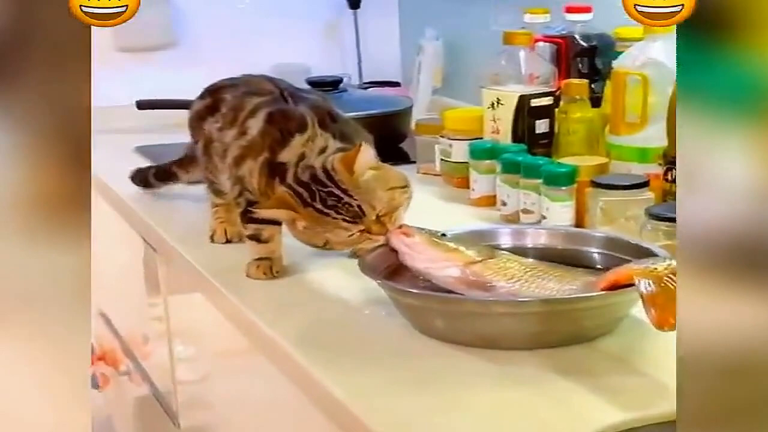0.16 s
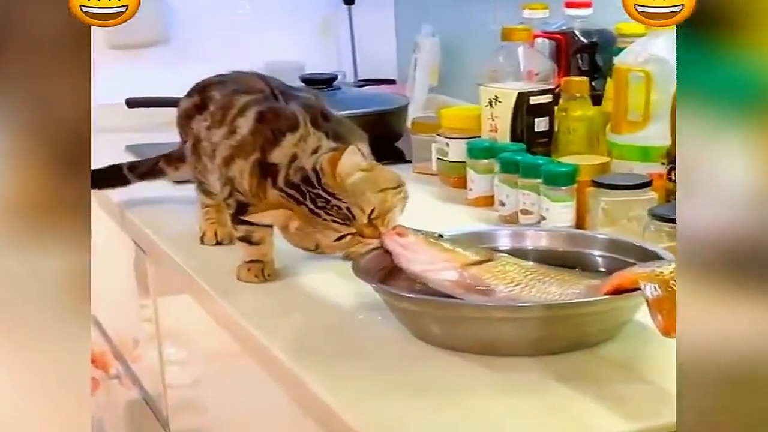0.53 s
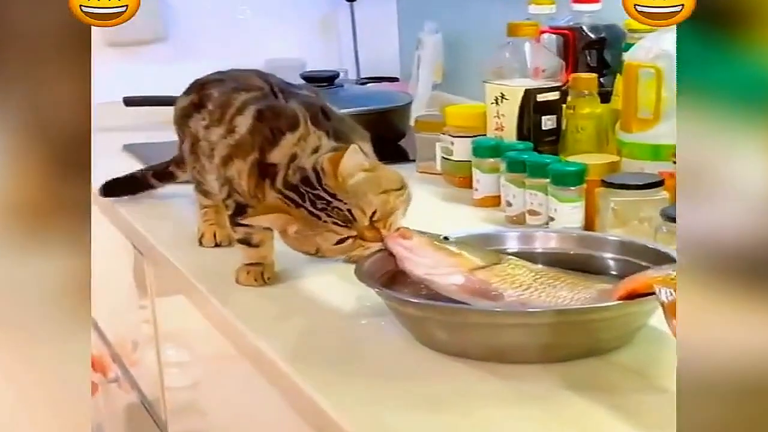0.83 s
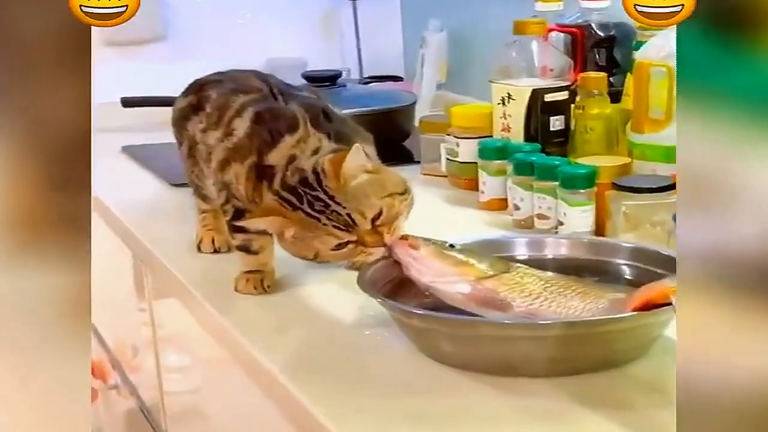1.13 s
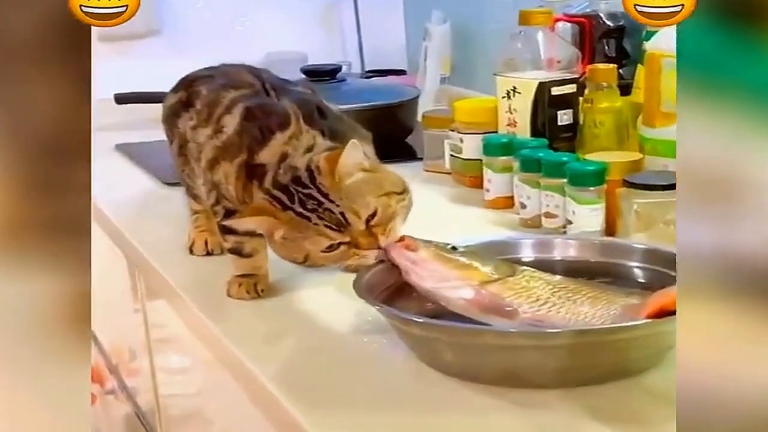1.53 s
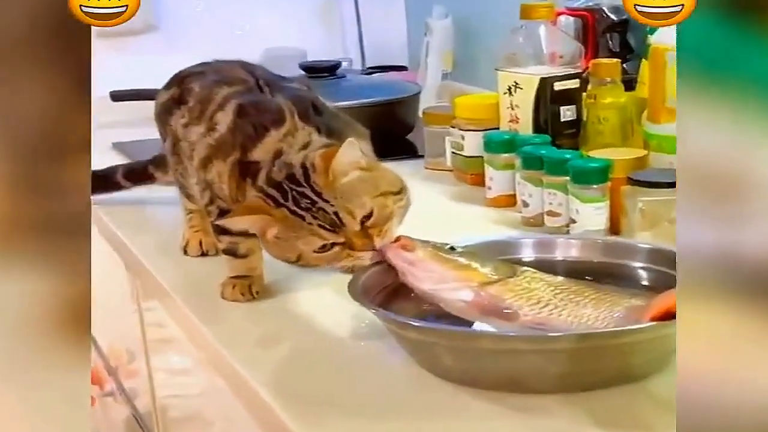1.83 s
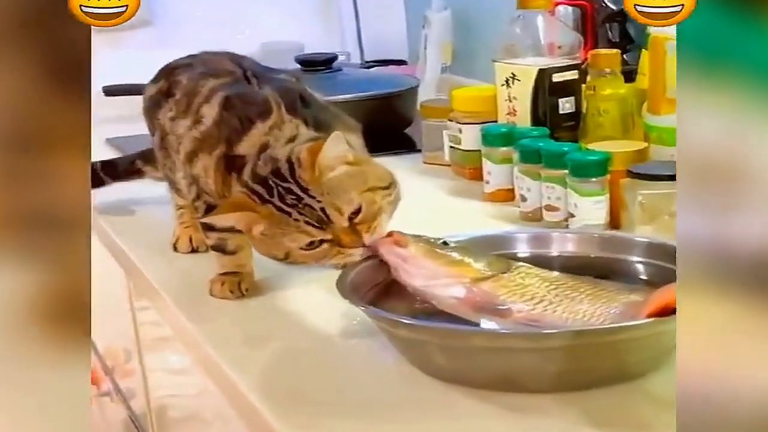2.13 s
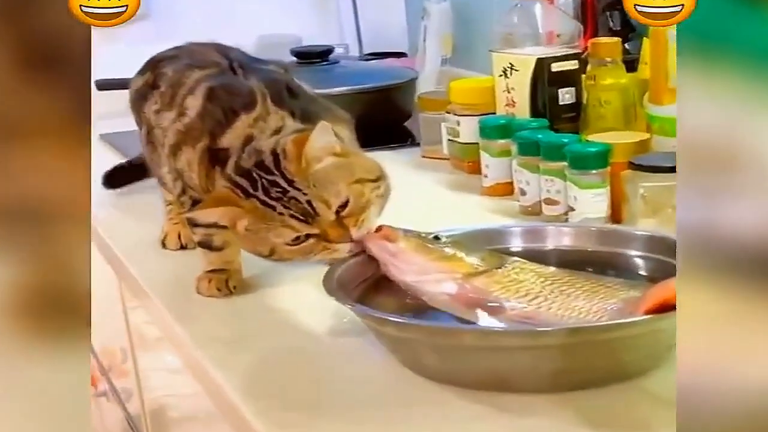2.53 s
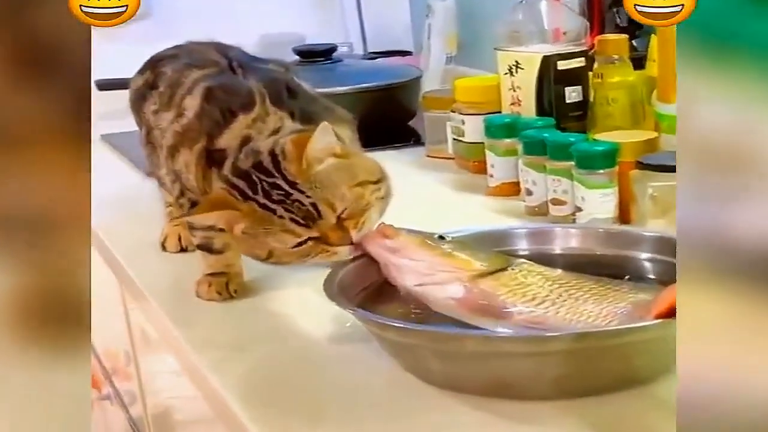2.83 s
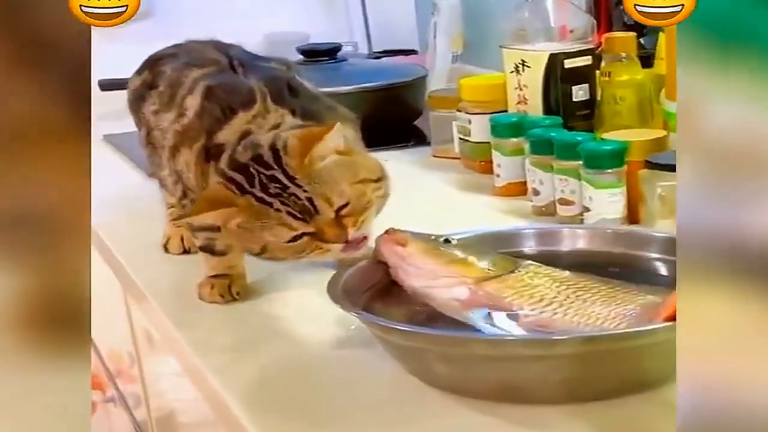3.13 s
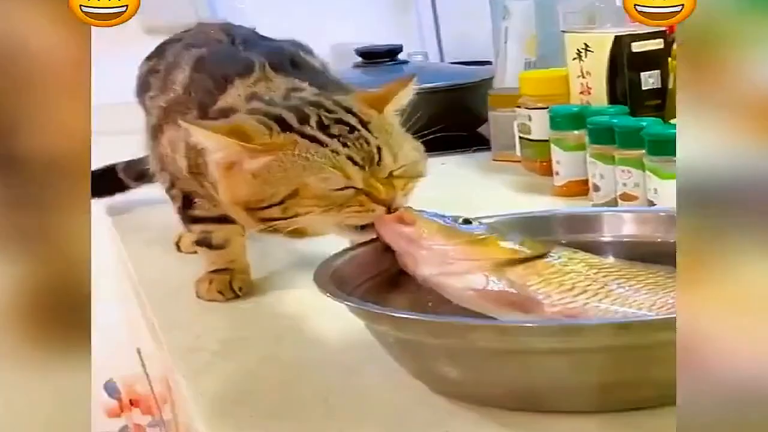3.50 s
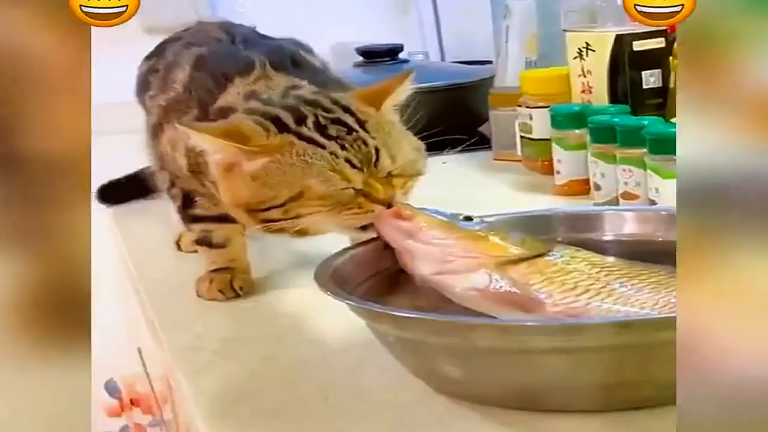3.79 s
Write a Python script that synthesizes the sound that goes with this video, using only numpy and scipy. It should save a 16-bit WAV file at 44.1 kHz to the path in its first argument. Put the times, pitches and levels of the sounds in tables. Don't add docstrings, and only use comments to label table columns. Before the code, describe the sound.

Muffled fluttering cat growl with wet chewing smacks, then a sudden higher yowl, close in a kitchen

```python
import sys
import numpy as np
from scipy import signal
from scipy.fft import rfft, irfft, next_fast_len
from scipy.io import wavfile

SR = 44100
rng = np.random.default_rng(int(sys.argv[2]) if len(sys.argv) > 2 else 0)


def decibels_to_gain(level_db):
    exponent = np.asarray(level_db, float) / 20
    return 10 ** exponent


def persist_wave(psi):
    counts = np.round(np.clip(psi, -1, 1) * 32767).astype(np.int16)
    wavfile.write(sys.argv[1], SR, np.atleast_2d(counts).T)


N = 174195

# time in seconds, hum pitch in Hz, hum level in
# dB, throat pulse level in dB.
GROWL_CONTOUR = [
    (0, 211.2, -21, -26.5),
    (.11, 188.1, -19, -30),
    (.26, 205, -19, -28.5),
    (.4, 180.3, -18.5, -30),
    (.52, 190, -15.5, -30.5),
    (.6, 180.5, -15.5, -31),
    (.76, 173.8, -15, -33),
    (.87, 190.7, -14, -28),
    (1.07, 181, -23.5, -33),
                 (1.239, 175.9, -27, -49.5),
    (1.351, 166.9, -21, -44),
    (1.421, 152.2, -17.5, -38.5),
    (1.489, 186.7, -21.5, -36),
    (1.611, 187.3, -20.5, -38.5),
    (1.68, 183.2, -15, -34),
    (1.791, 164.7, -19, -34.5),
    (1.87, 162.7, -17, -36),
    (1.95, 202.7, -15, -26.5),
                 (2.0, 207, -20, -25.5),
    (2.06, 187.5, -15.5, -29),
    (2.118, 166.7, -16.5, -37.5),
    (2.193, 184.9, -15, -28.5),
    (2.257, 169.1, -16, -33.5),
    (2.328, 200.4, -17.5, -25),
    (2.421, 171.3, -16, -29),
    (2.498, 160.3, -17, -27.5),
    (2.599, 159.2, -16, -26.5),
                 (2.672, 179.1, -17.5, -25),
    (2.733, 158.4, -16.5, -28),
    (2.881, 156, -17, -25.5),
    (2.96, 200.1, -18, -28),
    (3.032, 197.6, -17, -23.5),
    (3.118, 187.2, -14, -27.5),
    (3.167, 181.8, -16.5, -33.5),
                 (3.35, 191.6, -20.5, -26.5),
    (3.42, 173.9, -16.5, -27.5),
    (3.501, 184.2, -16.5, -25),
    (3.572, 201.8, -17, -23.5),
    (3.64, 200.2, -18, -23.5),
    (3.687, 203, -46, -22),
]
# start in seconds, end in seconds.
BREATHS = [
    (-.1, 1.085),
    (1.24, 3.17),
    (3.345, 3.69),
]
# time in seconds, pulse rate in Hz, first partial in dB, second partial in dB.
YOWL = [
    (3.63, 300, -56.5, -63),
    (3.69, 367.7, -22, -29.5),
    (3.745, 426.6, -52, -21),
    (3.8, 424.2, -32, -27.5),
    (3.86, 401.7, -27.5, -27),
    (3.905, 406, -24, -21.5),
    (3.96, 355, -18, -29.5),
]
# widest moment in seconds, opening in seconds, closing in seconds, level in dB,
# upper resonances in dB.
CHEWS = [(0.059, 0.068, 0.07, -36, -16), (0.139, 0.077, 0.085, -33.5, -5.5),
         (0.342, 0.057, 0.047, -36, -24), (.42, 0.14, 0.15, -36.5, -4), (0.636, 0.034, 0.054, -33.5, -16),
         (0.728, 0.082, 0.086, -35.5, 2.5), (0.951, 0.055, 0.057, -29.5, -16.5),
         (1.021, 0.075, 0.084, -36.5, -2), (1.389, 0.051, 0.086, -40, -0.5),
         (1.49, 0.061, 0.08, -40.5, 7.5), (1.662, 0.037, 0.042, -32.5, -1), (1.771, 0.1, 0.074, -30.5, 0.5),
         (2.001, 0.11, 0.17, -28.5, -2.5), (2.402, 0.11, 0.093, -23.5, -3), (2.733, 0.094, 0.062, -32, -3),
         (2.98, 0.082, 0.078, -28, -10.5), (3.109, 0.091, 0.055, -23, -7),
         (3.38, 0.086, 0.062, -32.5, -7.5), (3.479, 0.081, 0.07, -17, -2.5), (3.822, 0.15, 0.077, -20, -1)]
# frequency in Hz, width in Hz, level in dB.
THROAT = [(341, 37.4, 4), (438.3, 37, 0.5), (527.7, 53.4, 3), (697, 64, -6), (793.5, 153, -14),
          (1115, 395, -20), (2380, 120, -27)]
MOUTH_SIDES = [(850.6, 45, 5.5), (1159, 89, 4), (1194, 405, -10)]
MOUTH_MIDDLE = [(933, 35.3, 0), (1050, 58, 0)]
MOUTH_UPPER = [(1430, 39.7, 0.5), (1677, 62, 0), (1879, 124, -3.5), (2108, 424, -10.5)]
PHARYNX = [(552, 79, 0), (700, 50, 0), (800, 50, -1)]
# time in seconds, side resonances in dB, middle resonances in dB.
TONGUE = [
    (0, -1, -4),
    (1.1, -2, -1.5),
    (1.4, -6.5, -3),
    (2.0, -2.5, -0.5),
    (2.35, -3, 2.5),
    (3.1, -4, -2),
    (3.45, -3.5, -6),
    (3.95, 5, 8.5),
]
# centre in seconds, half width in seconds, depth in dB.
FLIPS = [
    (0.073, 0.043, 10.5),
    (0.343, 0.025, 12.5),
    (.65, 0.02, 11),
    (0.971, 0.026, 13),
    (1.369, 0.058, 7.5),
    (1.999, 0.044, 5),
    (2.57, 0.068, 7.5),
    (2.8, 0.057, 7),
]
# centre in seconds, half width in seconds, gain in dB.
SAGS = [
    (1.53, 0.075, 11),
    (2.8, .08, 2),
]
# centre in seconds, half width in seconds, level in dB.
GULPS = [
    (2.98, 0.082, -37),
    (3.6, 0.049, -29.5),
    (3.68, 0.017, -44),
]
MOUTH_PATTERN_DB = [0, -1, -7, -10]
THROAT_PATTERN_DB = [0, -1, -8]
# time in seconds, peak level in dB, pitch in Hz.
SMACKS = [(0.0782, -21, 6340), (0.091, -23, 5900), (0.244, -28.5, 5530), (0.2857, -32.5, 6470),
          (0.3566, -30, 5020), (0.399, -22, 5660), (.413, -29.5, 4840), (.5536, -33, 5370),
          (0.6456, -28, 5900), (.6774, -30, 4770), (0.6986, -27.5, 5570), (0.8305, -33, 5000),
          (1.0056, -32.5, 5500), (1.064, -41, 1730), (1.363, -26, 2483), (1.43, -25.5, 6000),
          (1.5368, -22.5, 5493), (1.578, -22, 2430), (1.6444, -25, 3107), (1.6881, -24, 5750),
          (1.7416, -24, 4648), (1.8333, -12, 5000), (1.841, -31.5, 5000), (2.038, -27.5, 5868),
          (2.2901, -25.5, 7267), (2.703, -27.5, 6484), (2.9881, -25.5, 7247), (3.1077, -30, 6708),
          (3.2674, -41, 2987), (3.352, -24, 3009), (3.4535, -21.5, 4518), (3.471, -33, 5500),
          (3.487, -37.5, 5072), (3.747, -28.5, 7210), (3.7641, -53, 3070)]
# start in seconds, length in seconds, level in dB, centre in Hz, width in Hz.
GASPS = [(.612, .025, -44, 2900, 600), (.858, .035, -46, 3050, 500), (1.24, .03, -43, 1800, 500),
         (1.262, .025, -45, 3150, 400), (1.266, 0.02, -35, 2080, 400), (1.366, 0.065, -39, 3200, 1000),
         (1.38, .06, -39.5, 2200, 500), (1.683, 0.025, -39, 3250, 600), (1.96, .09, -43, 3150, 500),
         (3.264, 0.055, -51.5, 6500, 1500), (3.265, 0.089, -40, 1500, 900), (3.27, 0.076, -38, 2800, 1800),
         (3.564, .07, -54.5, 7000, 899)]
# start in seconds, level in dB, pitch in Hz, 60 dB decay in seconds.
THUDS = [
    (0.931, -15.5, 80, 0.36),
    (2.242, -16.5, 76.65, 0.21),
]
# frequency in Hz, level in dB per Hz.
ROOM = [(20, 4), (45, -1.5), (94, -5.5), (400, -19), (1200, -37), (2600, -37.5), (6000, -44.5),
        (8500, -51.5)]
# time in seconds, peak level in dB.
TICKS = [
    (0.0024, -84),
    (1.063, -56),
    (1.363, -57),
    (1.8327, -58.5),
    (1.8393, -42.5),
    (1.8504, -57),
    (2.421, -41),
    (3.1166, -54.5),
    (3.443, -57.5),
    (3.4845, -53.5),
]


def in_time(rows):
    s, *columns = np.transpose(rows)
    return [np.interp(np.arange(N) / SR, s, column) for column in columns]


def bumps(rows):
    t = np.arange(N) / SR
    return sum(height * np.exp(-((t - s) / half) ** 2) for s, half, height in rows)


def rms_one(x):
    return x / np.sqrt(np.mean(x ** 2) + 1e-20)


def drift(rate):
    r = np.exp(-80 * np.pi * rate / SR)
    noise = rng.standard_normal(N // 40 + 2002)
    slow = signal.lfilter([1], [1, -2 * r, r * r], noise)[2000:]
    return np.interp(np.arange(N) / 40, np.arange(len(slow)), rms_one(slow))


def peak(x, hz, width):
    r = np.exp(-np.pi * width / SR)
    poles = [1, -2 * r * np.cos(2 * np.pi * hz / SR), r * r]
    return signal.lfilter([(1 - r * r) / 2, 0, (r * r - 1) / 2], poles, x + 1e-18)


def tract(x, resonances):
    out = 0
    for k, (hz, width, db) in enumerate(resonances):
        ring = peak(peak(x, hz, 2 * width), hz, 2 * width)
        out = out + (-1) ** k * decibels_to_gain(db) * ring
    return rms_one(out)


def pulses(cycles, strength, shimmer_db, rasp):
    whole = np.floor(cycles).astype(int)
    uneven = decibels_to_gain(shimmer_db * rng.uniform(-1.7, 1.7, 2000))
    size = strength * uneven[np.clip(whole, 0, 1999)]
    click = np.diff(np.maximum.accumulate(whole), prepend=whole[0]) > 0
    puff = np.exp(-1.2 * (cycles - whole)) * rng.standard_normal(N)
    mixed = (1 - rasp) * rms_one(size * click) + rasp * rms_one(size * puff)
    return signal.sosfilt(signal.butter(4, 4170, fs=SR, output="sos"), mixed)


def mouth():
    t = np.arange(N) / SR
    low, high = decibels_to_gain(-50), decibels_to_gain(-54)
    for s, opening, closing, db, upper_db in CHEWS:
        away = np.where(t < s, (s - t) / opening, (t - s) / closing)
        gape = decibels_to_gain(db - 18 * away ** 3)
        low = low + gape
        high = high + gape * decibels_to_gain(upper_db - 10.5 * away ** 2)
    return low, high


def voiced(low, source, throat_db, jaw):
    sides_db, middle_db = in_time(TONGUE)
    lower = decibels_to_gain(sides_db) * tract(source, MOUTH_SIDES) + decibels_to_gain(middle_db) * tract(source, MOUTH_MIDDLE)
    throat = decibels_to_gain(throat_db) * tract(low, THROAT)
    return throat + jaw[0] * lower + jaw[1] * tract(source, MOUTH_UPPER)


def voice_on():
    t = np.arange(N) / SR
    onset_s, release_s = .016, .014
    gate = 0
    for start, end in BREATHS:
        gate = gate + np.clip((t - start) / onset_s, 0, 1) * np.exp(-np.maximum(t - end, 0) / release_s)
    return gate


def growl_pulses(cycles, pattern_db):
    shaky = cycles * len(pattern_db) / 3 + .05 * drift(120) + .3
    strength = decibels_to_gain(pattern_db)[np.floor(shaky).astype(int) % len(pattern_db)]
    return pulses(shaky, strength, shimmer_db=2, rasp=.3)


def hum_line(cycles, db, thirds):
    return np.sqrt(2) * decibels_to_gain(db + 1.8 * drift(30)) * np.sin(2 * np.pi * cycles * thirds / 3)


def growl(jaw):
    contour = GROWL_CONTOUR
    hz, hum_db, throat_db = in_time(contour)
    cycles = np.cumsum(hz * (1 + .022 * drift(25))) / SR
    flip = bumps(FLIPS)
    hum = hum_line(cycles, hum_db - flip, 3)
    hum = hum + hum_line(cycles, hum_db - 16 + 1.3 * flip, 4)
    hum = hum + hum_line(cycles, hum_db - 20 + bumps(SAGS), 2)
    hum = hum + hum_line(cycles, hum_db - 27 + 1.3 * flip, 8)
    low = growl_pulses(cycles, THROAT_PATTERN_DB)
    source = -growl_pulses(cycles, MOUTH_PATTERN_DB)
    gulp = bumps([(s, half, decibels_to_gain(db)) for s, half, db in GULPS]) * tract(low, PHARYNX)
    return voice_on() * (hum + gulp + voiced(low, source, throat_db, jaw))


def breath():
    white = rng.standard_normal(N)
    hiss = 0
    for hz in np.geomspace(2500, 7400, 14):
        hiss = hiss + decibels_to_gain(5.5 * drift(9)) * rms_one(peak(white, hz, .06 * hz))
    return decibels_to_gain(-67.5) * voice_on() * hiss


def room_noise():
    edges = 20 * 2 ** np.arange(0, 9.1, .5)
    white = rng.standard_normal((2, N))
    room_hz, room_db = np.transpose(ROOM)
    out = 0
    for k, (low, high) in enumerate(zip(edges, edges[1:])):
        band = signal.sosfilt(signal.butter(2, [low, high], "band", fs=SR, output="sos"), white[k % 2])
        db = np.interp(np.log(low * high) / 2, np.log(room_hz), room_db)
        out = out + decibels_to_gain(db + 2.8 * drift(13)) * band
    return decibels_to_gain(-33.5) * rms_one(out)


def smacks():
    out, t = np.zeros(N + SR), np.arange(SR // 8) / SR
    rise_s, crack_t60_s, core_s = .003, .024, .0064
    for s, db, hz in SMACKS:
        noise = rng.standard_normal((2, len(t)))
        i = int((s - rise_s / 2) * SR)
        crack = signal.lfilter([.5, -.5], [1, -.6], noise[0]) * decibels_to_gain(-60 * t / crack_t60_s)
        core = decibels_to_gain(-.5) * rms_one(peak(noise[1], hz, 900)) * decibels_to_gain(-20 * t / core_s)
        out[i:i + len(t)] += decibels_to_gain(db + .5) * (crack + core) * np.clip(t / rise_s, 0, 1) ** 2
    return out[:N]


def gasps():
    out, t = np.zeros(N + SR), np.arange(SR // 8) / SR
    for s, length, db, hz, width in GASPS:
        grit = rng.random(len(t)) < 700 / SR
        noise = rng.standard_normal(len(t)) * (.27 + grit)
        i = int(s * SR)
        shape = np.clip(t / .00083, 0, 1) * decibels_to_gain(-12 * (t / length) ** 3)
        out[i:i + len(t)] += decibels_to_gain(db) * shape * rms_one(peak(peak(noise, hz, width), hz, width))
    return out[:N]


def basin():
    t = np.arange(N) / SR
    out = 0
    for s, db, hz, t60 in THUDS:
        envelope = decibels_to_gain(db - 60 * np.maximum(t - s, 0) / t60) * np.clip((t - s) / .02, 0, 1)
        out = out + envelope * np.sin(2 * np.pi * hz * (t - s))
    return out


def yowl(jaw):
    hz, first_db, second_db = in_time(YOWL)
    flutter = np.cumsum(55 * (1 + .2 * drift(21))) / SR
    chop = 1 + .65 * np.cos(2 * np.pi * flutter)
    cycles = np.cumsum(hz * (1 + .02 * drift(50))) / SR + .045 * drift(150)
    clear = decibels_to_gain(first_db) * np.cos(2 * np.pi * cycles) + decibels_to_gain(second_db) * np.cos(4 * np.pi * cycles)
    source = -pulses(cycles, chop, shimmer_db=2.2, rasp=.24)
    yowl_jaw = [gain * decibels_to_gain(-10.5) for gain in jaw]
    on = np.clip((hz - 300) / 70, 0, 1)
    return on * (chop * clear + voiced(source, source, second_db - 6, yowl_jaw))


def kitchen(x):
    t60_s = .17
    size = next_fast_len(N + SR)
    w = 2 * np.pi * np.arange(size // 2 + 1) / size
    response = 0
    for k, lag in enumerate(rng.uniform(.011, .036, 8) * SR):
        loop = decibels_to_gain(-60 * lag / SR / t60_s) * np.exp(-1j * w * lag)
        response = response + (-1) ** k * loop / (1 - loop)
    return irfft(rfft(x, size) * response, size)[:N]


def scene():
    jaw = mouth()
    cat = growl(jaw) + smacks() + gasps() + yowl(jaw)
    return (cat + decibels_to_gain(-24) * kitchen(cat) + breath() + room_noise() + basin())[None]


def low_pass(x):
    return signal.sosfilt(signal.butter(12, 15100, fs=SR, output="sos"), x)


def record(dry):
    edge = signal.ellip(7, .5, 26, 7650, fs=SR, output="sos")
    shelf = signal.cheby2(12, 65, 9200, fs=SR, output="sos")
    cut = signal.sosfilt(np.vstack([edge, shelf]), dry)
    ticks = np.zeros(N)
    for s, db in TICKS:
        ticks[int(s * SR)] = decibels_to_gain(db + 1)
    return low_pass(cut + np.diff(ticks, prepend=0))


dry = scene()
out = record(dry)
persist_wave(out)
```